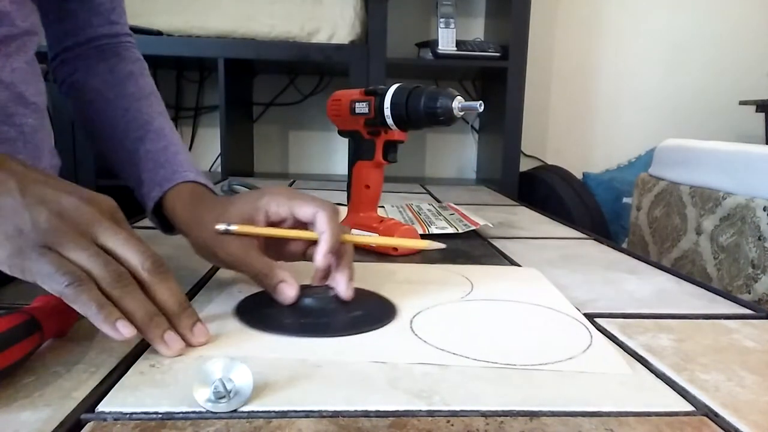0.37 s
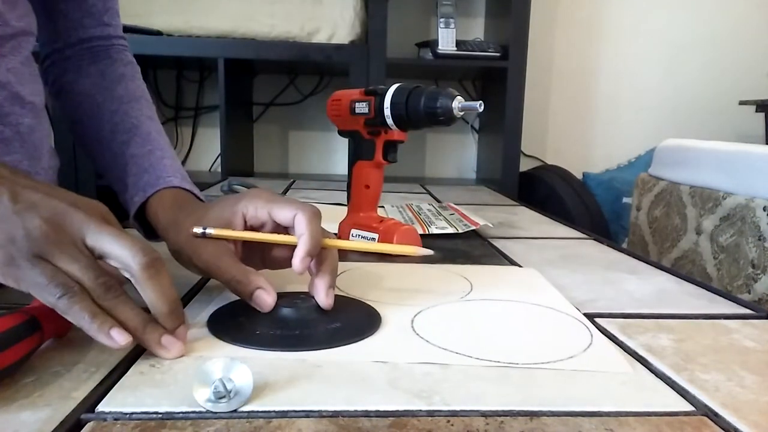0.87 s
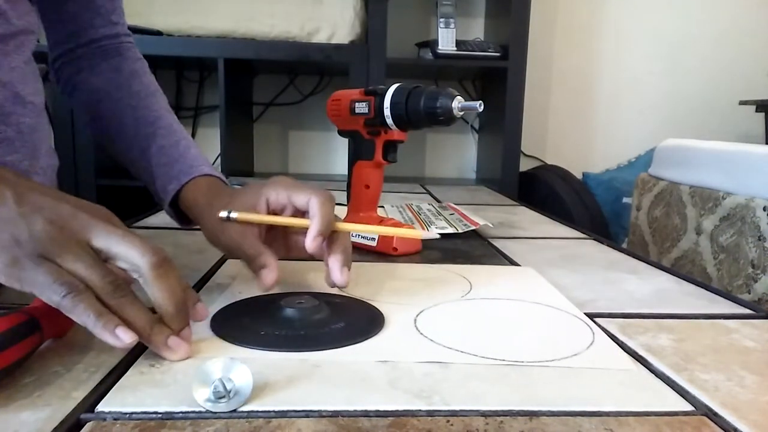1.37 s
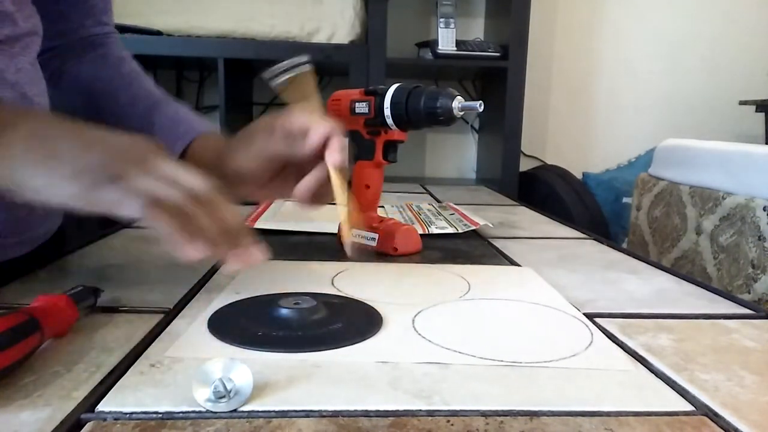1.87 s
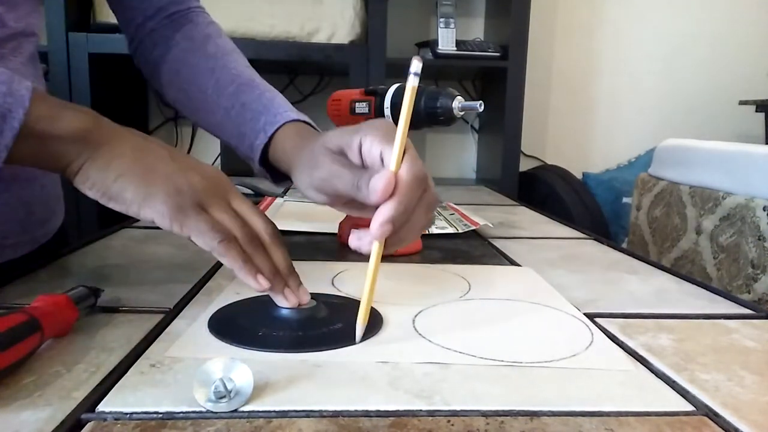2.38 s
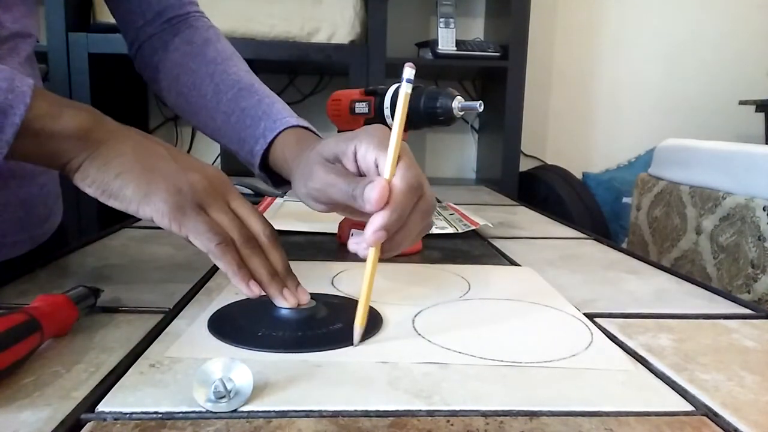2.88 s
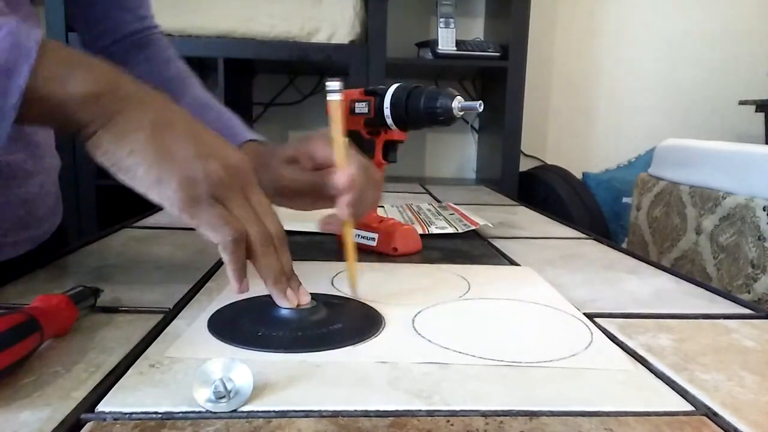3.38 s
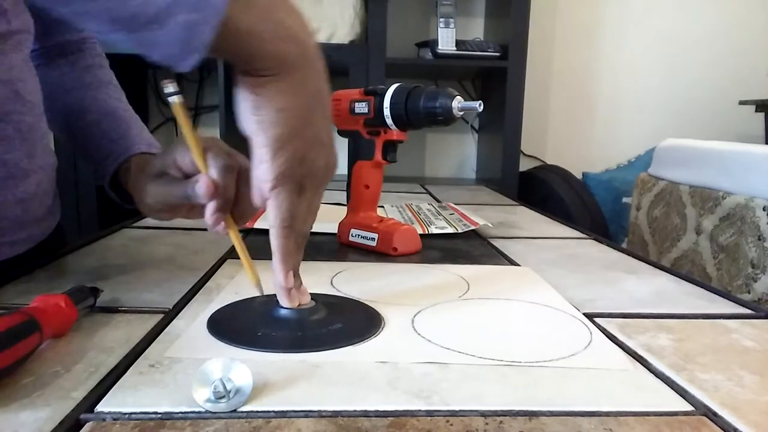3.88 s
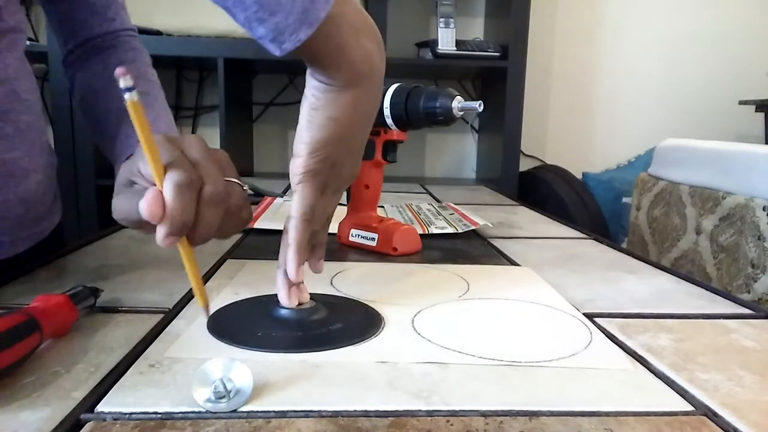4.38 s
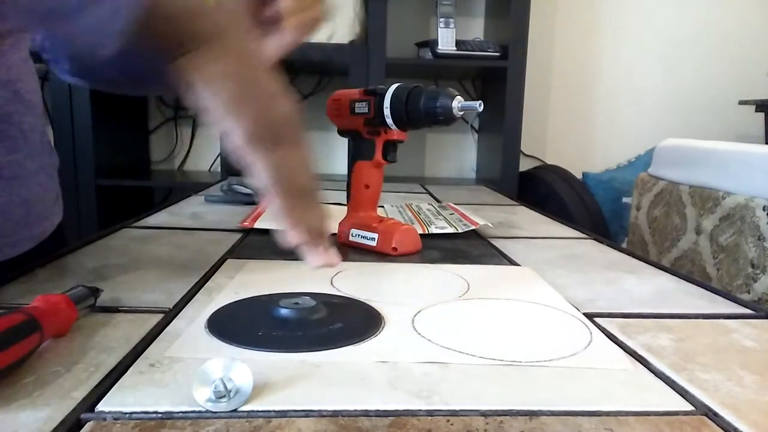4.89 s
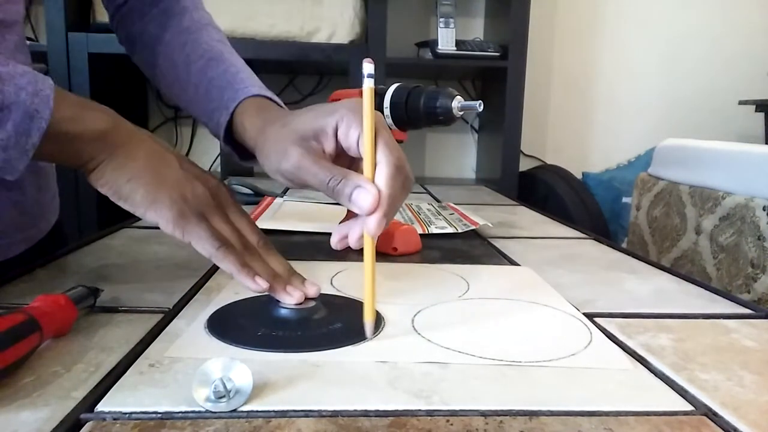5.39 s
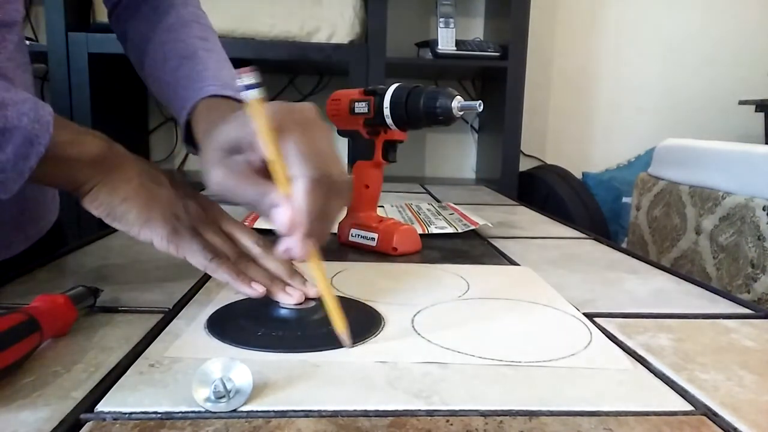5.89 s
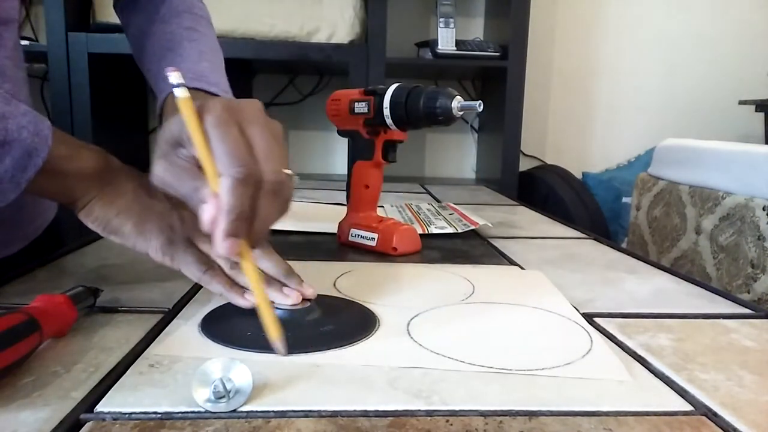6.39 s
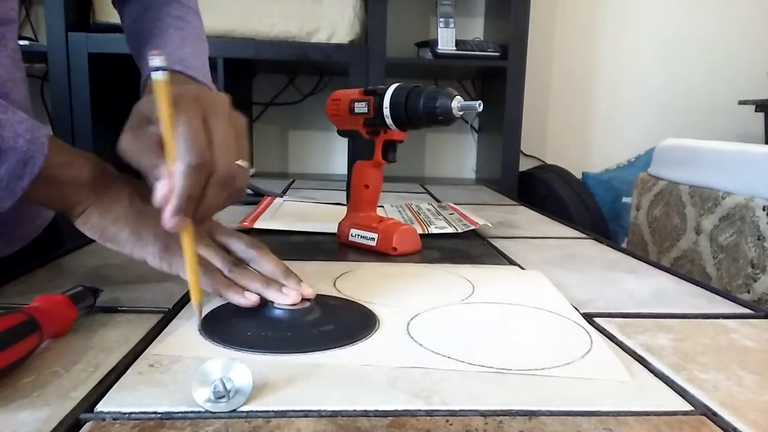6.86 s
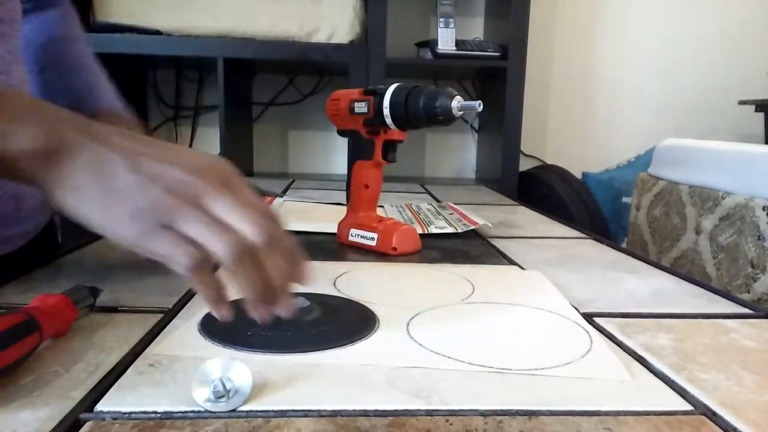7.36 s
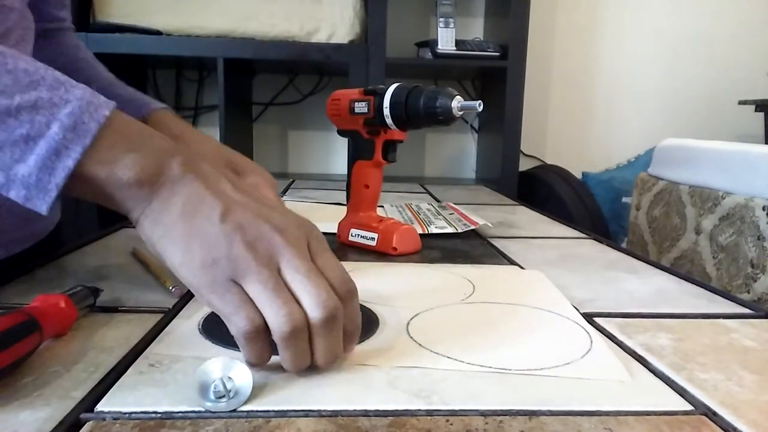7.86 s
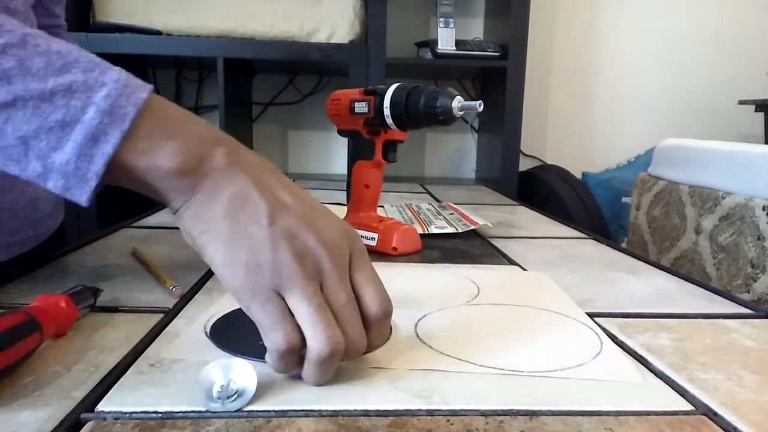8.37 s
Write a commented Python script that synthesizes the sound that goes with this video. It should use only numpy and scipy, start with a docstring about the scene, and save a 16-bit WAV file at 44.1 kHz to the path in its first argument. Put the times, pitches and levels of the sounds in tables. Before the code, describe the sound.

Brisk sliding and crisp snaps of a sandpaper sheet come first, as a pad is settled on it. A pencil then traces its edge, hissing and rasping with a woody ring, in two groups of uneven bursts separated by about a second. Finally hands grasp the pad with little knocks, brushes and a bump. Close stereo microphones, short indoor tail, low room hum.

```python
"""A pencil is drawn in jerks around a rubber pad on the paper back of a sandpaper sheet lying on tiles:
grains driven as noise make hiss and rasp and ring pad, sheet and two gliding pencil modes.
Before and after, hands slide pad and sheet into place with snaps, bumps and small knocks (noise-struck modes).
Soft low thumps are decaying sines; a quiet room hum is shaped noise.
Two close microphone ports, each with its own treble colour, hear it with a short room tail."""
import sys
import numpy as np
from scipy import signal
from scipy.fft import rfft, irfft
from scipy.io import wavfile
from scipy.ndimage import uniform_filter1d, map_coordinates

SR = 44100
rng = np.random.default_rng(int(sys.argv[2]) if len(sys.argv) > 2 else 0)


def voltage_ratio(level):
    """Linear amplitude factor for a level in decibels (scalar or array-like)."""
    return 10 ** (np.asarray(level, float) / 20)


def store_wav(level_fs):
    """Save 16-bit WAV to argv[1]."""
    pcm = np.round(np.clip(np.atleast_2d(level_fs), -1, 1) * 32767)
    wavfile.write(sys.argv[1], SR, pcm.T.astype(np.int16))


N = 374850  # samples

# pencil bending modes, shifting with grip and slant:
# (time [s], low mode [Hz], its gain [dB], high mode [Hz], its gain [dB], rasp gain [dB])
PENCIL_MODES = [(2.95, 1240, 0, 2230, 15.5, -3), (3.25, 1237, 11, 2324, 19, -1.5),
                (3.4, 1300, 11, 2230, 23, -5), (3.5, 1080, -7, 2270, 4, 1), (3.66, 1150, 19, 2280, 24, 2.5),
                (3.9, 1055, 10, 2230, 15.5, -1.5), (4.2, 1120, -1, 2180, 14, -0.5),
                (4.42, 1400, 5, 2010, 10, -1.5), (4.52, 1400, 17.5, 2200, -4, 1.5),
                (5.399, 1157, 24.5, 2210, 12, 1.5), (5.95, 1154, 24, 2230, 21.5, -2),
                (6.1, 1170, 16.5, 2250, 13, 4), (6.19, 1083, 19.5, 2190, 18, 0),
                (6.47, 1150, 22, 2200, 5, 0.5), (6.6, 1150, 17.5, 2370, 15.5, 1.5),
                (6.95, 1065, 4, 2190, 9, 2.5)]
# long pencil arcs, one table each: (time [s], speed as hiss level [dB], weight on the tip [dB])
ARCS = [
    [(2.957, -53, -4), (2.961, -45.5, -2), (3.169, -35, 4), (3.469, -40.5, 4), (3.487, -35.5, 1),
     (3.501, -43, 5), (3.825, -45, 3.5), (3.845, -50, -7.5)],
    [(4.278, -39.5, 7), (4.43, -34.5, 2.5), (4.436, -50, 7), (4.46, -25.5, -4), (4.564, -26.5, 8.5),
     (4.6, -30, 15.5), (4.61, -50.5, 0)],
    [(5.976, -39, -1), (6.027, -36, 5.5), (6.061, -50.5, -8), (6.181, -37, -9), (6.203, -45, 10),
     (6.215, -46, -3)],
    [(6.445, -47, 10), (6.463, -38.5, -1), (6.707, -36.5, -5), (6.769, -47, 2.5), (6.779, -39.5, -2.5),
     (6.919, -42.5, 4), (6.947, -27.5, 10), (6.97, -66, 16)],
]
# short pencil jerks: (start [s], length [s], speed as hiss level [dB], weight [dB])
JERKS = [(3.852, 0.051, -39, 5.5), (3.908, 0.059, -42, 0), (3.986, 0.019, -46.5, 2),
         (4.031, 0.083, -35.5, 1), (4.11, 0.029, -40, 8), (4.139, 0.062, -35.5, 5), (4.239, 0.026, -36, -2),
         (5.873, 0.077, -35, 3.5), (6.339, 0.035, -43, 2.5), (6.371, 0.075, -42, 1.5)]
# tip catches or taps: (time [s], hiss level [dB], rasp re hiss [dB], body re hiss [dB])
TAPS = [(2.5376, -53.5, -16, -23.5), (2.5912, -52.5, 0, -15), (3.082, -24, -17, -19),
        (4.1516, -23, -6, -7.5), (4.4021, -28, -20, -26), (4.479, -25, -6, -2), (4.539, -11.5, -19, -11),
        (5.3809, -51, -23, 10), (5.5197, -66, 9, 4), (5.879, -31, -5, -17), (5.98, -37, -11, 0),
        (6.025, -38, -6, 3), (6.1917, -18.5, -11, -15.5), (6.351, -33, -2.5, -17), (6.4035, -29, -13, -7.5),
        (6.466, -39.5, 6, 6), (6.548, -44, -8, -16), (6.798, -31.5, -1, -6)]
# long shoves of pad and sheet, one table each: (time [s], speed as hiss level [dB], weight [dB])
SHOVES = [
    [(0.0, -36.5, -9), (0.02, -31, -5), (0.094, -39, -17), (0.236, -36, -14), (0.3, -62.5, -29)],
    [(0.378, -39.5, -10), (0.386, -42, -29), (0.45, -46.5, 6), (0.674, -50.5, 1.5), (0.69, -45, 2)],
    [(0.81, -47.5, -6), (0.932, -53, 4), (0.976, -72, 28), (0.982, -59, 17), (1.04, -74, 21)],
    [(8.22, -55.5, 13), (8.318, -58, 24), (8.372, -36.5, 1.5), (8.412, -48, -9), (8.43, -44, -2)],
]
# short hand brushes: (start [s], length [s], top speed as hiss level [dB], weight [dB])
BRUSHES = [(0.693, 0.091, -46, 1), (1.091, 0.15, -47, 7), (1.629, 0.11, -46.5, -10),
           (1.91, 0.17, -69.5, -2), (7.132, 0.25, -70.5, -7), (7.847, 0.063, -52.5, 5),
           (7.906, 0.087, -46.5, 2.5), (8.002, 0.14, -52, -4), (8.115, 0.11, -45, -3),
           (8.416, 0.047, -43, 4)]
# paper snaps and knocks under the hands: (time [s], hiss level [dB], rasp re hiss [dB], body re hiss [dB])
SNAPS = [(0.1472, -22.5, -4, -15), (0.4029, -23.5, -31, -42), (0.599, -36, 0, -14), (0.783, -40.5, 1, -19),
         (0.935, -32, -16, -34), (0.9847, -25.5, -20, -31), (1.153, -32, -6, -14), (1.2006, -29.5, -6, -18),
         (2.238, -50.5, -1.5, -20), (7.3623, -55, 5, -1), (7.703, -39, 3, -1), (7.7511, -43.5, 11, 8),
         (7.8125, -34, -3, -20), (8.0515, -31, -8, -32), (8.134, -44, 3, -14), (8.431, -31, 0, -18)]
# rasp row, body row: (level at usual speed [dB], speed slope [dB/dB], weight slope [dB/dB])
TIP_LAW = [(-50, 0.61, 0.32), (-50.5, 0.48, 0.86)]
HAND_LAW = [(-47.5, 0.97, 0.25), (-62, 0.88, 0.9)]
# spectral shapes of the rubbing: (frequency [Hz], relative level [dB])
HISS_SHAPE = [(3500, -36), (6000, -11), (7900, -11), (11000, 2.5), (13300, 5), (15500, 0)]
RASP_SHAPE = [(700, -34.5), (1200, -9.5), (1700, -9), (2950, -8), (4200, -2.5), (6000, -8.5), (8000, -15.5),
              (10000, -30.5)]
# modes of pad and sheet: (frequency [Hz], width [Hz], relative level [dB])
BODY_MODES = [(800, 960, -18), (1136, 100, -2.5), (1363, 300, 0.5), (2230, 110, 1)]
# pencil and fingers knock on the tile, the pad is bumped: (time [s], peak [dB], brightness [dB/octave])
KNOCKS = [(7.629, -34, 7), (7.7037, -30, 1.5), (7.751, -34.5, 3.5), (7.776, -36, 4.5), (8.351, -37, 0),
          (8.368, -36, 1)]
BUMPS = [(.1489, -24.5, 2), (.188, -34, -3), (8.226, -44, -3), (8.282, -39, 0), (8.431, -30, 6.5)]
# modes rung by knocks and by bumps: (frequency [Hz], relative level [dB], t60 [s])
TILE_MODES = [(520, -5, .02), (830, 1, .016), (1410, -5, .012), (1870, -1, .015), (2229, -1, .016),
              (2750, -7, .008), (3300, -5, .008), (4400, -7, .007)]
PAD_MODES = [(1190, -2, .03), (1400, -3, .03), (2235, -1, .03), (4030, -2, .025), (4700, -6, .02)]
# pad settling on the tile: (time [s], level [dB], frequency [Hz], t60 [s])
THUMPS = [(.955, -44, 405, 0.2), (0.9, -47, 350, 0.16), (1.135, -37, 215, 0.13)]
# where the hands work: (time [s], left minus right [dB])
PLACE = [(2.9, 1), (3.3, -1.5), (4.5, 0.5), (5.9, -0.5), (6.9, -1.5)]
# main spot heard at the right port: (frequency [Hz], share [0-1])
ALIKE = [(500, 1), (1200, 0.89), (2500, 0.77), (6000, 0.52), (15000, 0.4)]
# port colour for near sounds: (frequency [Hz], left gain [dB], right gain [dB])
PORT_COLOUR = [(60.5, -19.5, -26), (199.4, -0.5, -7.5), (1300, 3, 0), (2180, 4, -2), (4840, 0.5, -2),
               (7260, 7.5, 2.5), (8460, -8, 10), (9080, 10, 15.5), (10860, -1, 0.5), (13000, 4, -25.5),
               (15800, 6, -5)]
# room tail: (frequency [Hz], t60 [s])
ROOM_T60 = [(500, 0.11), (4000, 0.21), (15000, 0.12)]
# hum spectrum: (frequency [Hz], relative density [dB/Hz])
HUM_SHAPE = [(18, -72.5), (30, -33.5), (46, -26), (118, -3.5), (141, -4.5), (174, -6.5), (437, -17.5),
             (540, -17), (721, -21), (1130, -24), (3140, -29.5), (7470, -39), (16000, -47.5)]
# left-right likeness of the hum: (frequency [Hz], correlation [-1 to 1])
HUM_LIKENESS = [(60, 0.98), (240, 0.95), (950, 0.051), (3770, 0.014), (15000, -0.53)]

USUAL_SPEED_DB = -45
JERK_SAG_DB_PER_S = -130
BRUSH_ENDS_DB, BRUSH_SKEW = -15.5, 0.89
SHEET_HZ, SHEET_WIDTH_HZ, SHEET_DB = 1720, 370, 8.5  # broad hump of the pressed sheet
RATTLE_DECAY_S, WOBBLE_DECAY_S, WOBBLE_DB = 0.002, 0.042, -19  # blow, then weaker, longer rattle
SPOT_SHIFT, SPOT_DB = 0.0046, 2.5  # random spread of mode frequency (fraction) and level per blow
HUM_RMS_DB = -56.5
EDGE_HZ = 15850


def rubbing():
    """Grit under tip and hands drives hiss, rasp, body and pencil modes at two unlike contact spots."""
    tip_grit = grit(per_s=4100, spread_db=4.5, judder_db=1.57, slip_s=0.00023, blur_s=0.0053)
    hand_grit = grit(per_s=26000, spread_db=3.5, judder_db=1.5, slip_s=0.00022, blur_s=0.00068)
    tip_strokes = ARCS + [jerk(*row) for row in JERKS]
    hand_strokes = SHOVES + [brush(*row) for row in BRUSHES]
    tip = pressure(tip_strokes, TIP_LAW, TAPS, tip_grit, rise_s=0.0024, fall_s=0.02, catch_s=0.0019)
    hand = pressure(hand_strokes, HAND_LAW, SNAPS, hand_grit, rise_s=0.0058, fall_s=0.019, catch_s=0.0013)

    s, *columns = np.transpose(PENCIL_MODES)
    low_hz, low_db, high_hz, high_db, rasp_db = (np.interp(np.arange(N) / SR, s, c) for c in columns)
    flat_db = np.zeros(N)
    # the tip feeds the pencil more than the pad
    force = tip * voltage_ratio([flat_db, rasp_db, flat_db - 5.5]) + hand

    hiss_taps = colour(lambda hz: read(HISS_SHAPE, hz))
    rasp_taps = colour(lambda hz: read(RASP_SHAPE, hz))
    sound = through(force[:, 0], hiss_taps[None])
    sound += through(force[:, 1], rasp_taps[None])
    sound += through(force[:, 2], body_ring()[None])
    for spot in range(2):
        sound[spot] += voltage_ratio(SHEET_DB) * resonate(hand[spot, 2], np.full(N, SHEET_HZ), SHEET_WIDTH_HZ)
        sound[spot] += voltage_ratio(low_db) * resonate(tip[spot, 2], low_hz, 45)
        sound[spot] += voltage_ratio(high_db) * resonate(tip[spot, 2], high_hz, 72)
    return sound


def grit(per_s, spread_db, judder_db, slip_s, blur_s):
    """Random grain slips, a few large, clumped by judder: sharp for hiss, blurred for rasp and body."""
    size_db = spread_db * np.minimum(rng.exponential(1, N), 4.5)
    power = voltage_ratio(size_db) ** 2 * (rng.random(N) < per_s / SR)
    slow_noise = uniform_filter1d(uniform_filter1d(rng.standard_normal(N), 200), 200)
    judder = voltage_ratio(judder_db * evened(slow_noise))

    def lasting(decay_s):
        """Each slip's power decays exponentially."""
        smeared = signal.lfilter([1], [1, -np.exp(-1 / (decay_s * SR))], power)
        return evened(judder * np.sqrt(smeared))

    blurred = lasting(blur_s)
    return np.array([lasting(slip_s), blurred, blurred])


def pressure(strokes, law, catches, grains, rise_s, fall_s, catch_s):
    """Noise force for hiss, rasp, body at two spots: grains under strokes; a catch adds a burst and a push."""
    t, drive = np.arange(N) / SR, np.zeros((3, N))
    for rows in strokes:
        s, speed_db, weight_db = np.transpose(rows)
        a, b = round(s[0] * SR), round(s[-1] * SR)
        # strokes cut by the start or end of the scene get no fade there
        rise = (t[a:b] - s[0] + (a == 0)) / rise_s
        fall = (s[-1] - t[a:b] + (b >= N)) / fall_s
        edge = np.clip(np.minimum(rise, fall), 0, 1)
        levels_db = [speed_db]
        for usual_db, per_speed, per_weight in law:
            levels_db.append(usual_db + per_speed * (speed_db - USUAL_SPEED_DB) + per_weight * weight_db)
        for k, db in enumerate(levels_db):
            drive[k, a:b] += voltage_ratio(np.interp(t[a:b], s, db)) * edge
    drive *= grains

    u, push = t[:900], np.zeros((3, N))
    burst = (1 - np.exp(-u / 0.00037)) * (np.exp(-u / catch_s) + 0.19 * np.exp(-u / 0.0026))
    for s, db, rasp_db, body_db in catches:
        at = round(s * SR)
        drive[:, at:at + len(u)] += burst * voltage_ratio([[db], [db + rasp_db], [db + body_db]])
        push[2, at] = voltage_ratio(db + body_db + 7.0)
    return drive * rng.standard_normal((2, 3, N)) + push


def jerk(start_s, length_s, db, weight_db):
    """Pencil stroke that starts at full speed and sags."""
    end_db = db + JERK_SAG_DB_PER_S * length_s
    return [(start_s, db, weight_db), (start_s + length_s, end_db, weight_db)]


def brush(start_s, length_s, db, weight_db):
    """Hand stroke that speeds up and slows down in one arch."""
    u = np.linspace(0, 1, 12)
    speed_db = db + BRUSH_ENDS_DB * (1 - np.sin(np.pi * u ** BRUSH_SKEW))
    return np.transpose([start_s + length_s * u, speed_db, weight_db + 0 * u])


def body_ring():
    """Impulse response of the damped modes of pad and sheet, energy 1."""
    t = np.arange(3000) / SR
    taps = np.zeros(len(t))
    for hz, width_hz, db in BODY_MODES:
        decay = np.exp(-np.pi * width_hz * t)
        taps += voltage_ratio(db) * np.sqrt(width_hz) * decay * np.sin(2 * np.pi * hz * t)
    return taps / np.linalg.norm(taps)


def resonate(x, hz, width_hz):
    """Gliding resonance of gain 1: shifts the curve hz down to zero, smooths, shifts back."""
    turn = np.exp(2j * np.pi * np.cumsum(hz) / SR)
    r = np.exp(-np.pi * width_hz / SR)
    return 2 * (turn * signal.lfilter([1 - r], [1, -r], x / turn)).real


def knocks(rows, modes):
    """A short chattering noise blow rings the modes, with its own brightness and mode spread."""
    out, t = np.zeros(N + 6000), np.arange(3000) / SR
    envelope = np.exp(-t / RATTLE_DECAY_S) + voltage_ratio(WOBBLE_DB) * np.exp(-t / WOBBLE_DECAY_S)
    for s, db, tilt_db in rows:
        blow = rng.standard_normal(len(t)) * envelope
        sound = signal.fftconvolve(ring(modes, tilt_db), blow)
        out[round(s * SR):][:len(sound)] += voltage_ratio(db) * sound / abs(sound).max()
    return out[:N]


def ring(modes, tilt_db):
    """Sum of decaying sines; each blow draws its own mode frequencies and levels."""
    hz, mode_db, t60_s = np.transpose(modes)[:, :, None]
    hz = hz * (1 + SPOT_SHIFT * rng.standard_normal(hz.shape))
    t = np.arange(3000) / SR
    start_db = mode_db + SPOT_DB * rng.standard_normal(hz.shape) + tilt_db * np.log2(hz / 1500)
    return (voltage_ratio(start_db - 60 * t / t60_s) * np.sin(2 * np.pi * hz * t)).sum(0)


def thumps():
    """Soft low sines that swell and die as the pad settles."""
    t = np.arange(N) / SR
    out = np.zeros(N)
    for s, db, hz, t60_s in THUMPS:
        u = np.maximum(t - s, 0)
        out += voltage_ratio(db - 60 * u / t60_s) * (1 - np.exp(-u / 0.016)) * np.sin(2 * np.pi * hz * u)
    return out


def ports(main, other):
    """Right port hears the main spot late, in the treble the other spot too; tiles add a moving bounce."""
    hz = np.fft.rfftfreq(N, 1 / SR)
    alike = np.clip(read(ALIKE, hz), 0, 1)
    delayed = late(main, 2.2 + 2.11 * wander(top_hz=3.2))
    right = irfft(alike * rfft(delayed) + np.sqrt(1 - alike ** 2) * rfft(other), N)
    return np.array([x + voltage_ratio(-8.5) * late(x, 14 + 4.67 * wander(top_hz=1.5)) for x in (main, right)])


def late(x, samples):
    """Delays by a changing number of samples."""
    return map_coordinates(x, [np.arange(N) - samples], order=3)


def wander(top_hz):
    """Slow random-phase sines from 0.3 Hz to top_hz, rms 1."""
    t = np.arange(N) / SR
    return evened(sum(np.sin(2 * np.pi * (f * t + rng.random())) / np.sqrt(f)
                      for f in np.geomspace(.3, top_hz, 12)))


def space(x, room_db):
    """Adds a short room tail of sparse echoes in a steadily turning mix, then the colour of each port."""
    size, count = SR // 3, 3
    taps = np.zeros((count * 2, size))
    # one echo of random sign in every 20 samples
    at = np.arange(0, size - 20, 20) + rng.integers(0, 20, (count * 2, (size - 1) // 20))
    np.put_along_axis(taps, at, rng.choice([-1., 1.], at.shape), 1)
    hz, t, z = signal.stft(taps, SR, nperseg=256)
    decay = voltage_ratio(-60 * t / read(ROOM_T60, hz)[:, None])
    tail = signal.istft(z * decay, SR, nperseg=256)[1][:, :size]
    tail[:, :100] = 0
    bass = signal.lfilter(*signal.butter(1, 1200, fs=SR), tail)
    tail[1::2] += bass[0::2] - bass[1::2]  # long waves reach both ports alike
    tail *= voltage_ratio(room_db) / np.linalg.norm(tail[0])

    turn = 2 * np.pi * 2.3 * np.arange(N) / SR
    heard = x.copy()
    for k in range(count):
        share = np.sqrt(2 / count) * np.cos(turn + k * np.pi / count)
        heard += through(x * share, tail[2 * k:2 * k + 2])
    hz = np.fft.rfftfreq(N, 1 / SR)
    gain_db = [read(PORT_COLOUR, hz, column=1), read(PORT_COLOUR, hz, column=2)]
    return irfft(rfft(heard) * voltage_ratio(gain_db), N)


def hum():
    """Distant machinery and air: shaped noise, alike at both ports only in the bass, drifting in patches."""
    frames, hz = N // 512 + 5, np.fft.rfftfreq(2048, 1 / SR)
    a, b, c, d, patches = rng.standard_normal((frames, 1025, 5)).T
    patches = evened(uniform_filter1d(uniform_filter1d(patches, 8, 0), 8, 1))
    same = np.clip(read(HUM_LIKENESS, hz), -1, 1)[:, None]
    left = a + 1j * b
    right = same * left + np.sqrt(1 - same ** 2) * (c + 1j * d)
    z = np.array([left, right]) * voltage_ratio(read(HUM_SHAPE, hz)[:, None] + 1.64 * patches)
    return voltage_ratio(HUM_RMS_DB) * evened(signal.istft(z, nperseg=2048, noverlap=1536)[1][:, :N])


def evened(x):
    """Scales to rms 1."""
    return x / np.sqrt(np.mean(x ** 2) + 1e-20)


def read(points, hz, column=1):
    """Interpolates one table column on a log-frequency axis."""
    table = np.transpose(points)
    return np.interp(np.log(hz + 1), np.log(table[0] + 1), table[column])


def colour(db_of_hz):
    """Minimum-phase impulse response with the given spectral shape, energy 1."""
    hz = abs(np.fft.fftfreq(4096, 1 / SR))
    log_gain = np.log(voltage_ratio(np.maximum(db_of_hz(hz), -90)))
    taps = np.fft.ifft(np.exp(np.conj(signal.hilbert(log_gain)))).real[:2048]
    return taps / np.linalg.norm(taps)


def through(x, taps):
    """Convolves and keeps the length."""
    return signal.oaconvolve(x, taps, axes=-1)[..., :N]


def scene():
    """Rubbing, knocks and bumps through ports and room, over thumps and hum."""
    main, other = rubbing() + knocks(KNOCKS, TILE_MODES) + knocks(BUMPS, PAD_MODES)
    near = ports(main, other)
    lean_db = np.interp(np.arange(N) / SR, *np.transpose(PLACE)) / 2
    return space(near * voltage_ratio([lean_db, -lean_db]), room_db=-9.5) + thumps() + hum()


def band_limit(x):
    """A steep low-pass at the top of the band."""
    return signal.sosfilt(signal.butter(12, 16980, fs=SR, output="sos"), x)


def record(dry):
    """Band-limits and finishes the mix."""
    lowpass = signal.firwin(301, EDGE_HZ, window=("kaiser", 8), fs=SR)
    limited = signal.oaconvolve(dry, lowpass[None], "same")
    return band_limit(limited)


dry = scene()
out = record(dry)
store_wav(out)
```